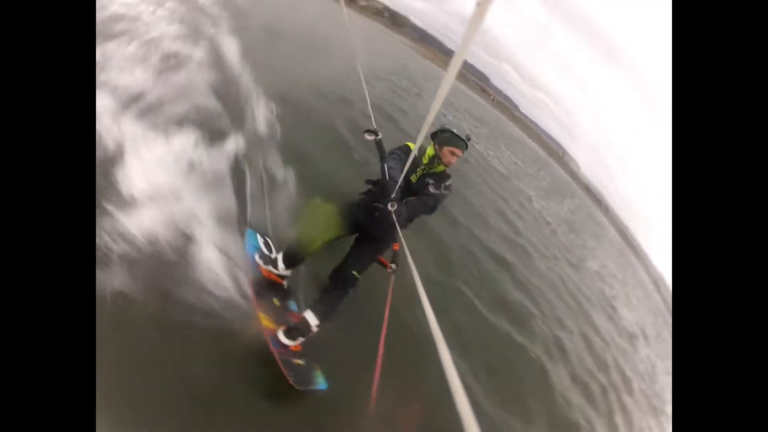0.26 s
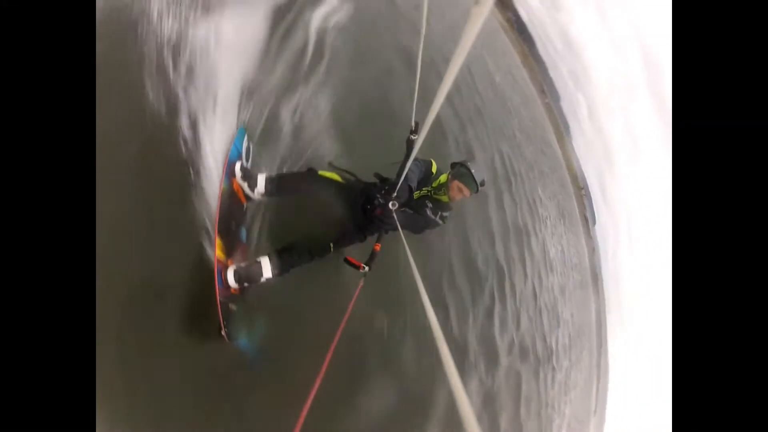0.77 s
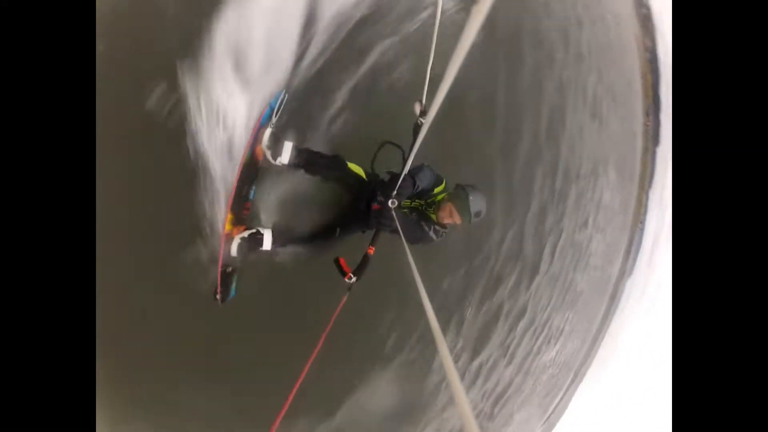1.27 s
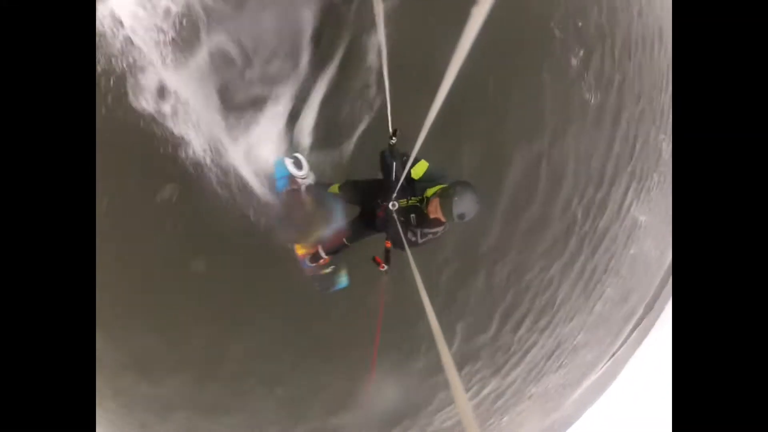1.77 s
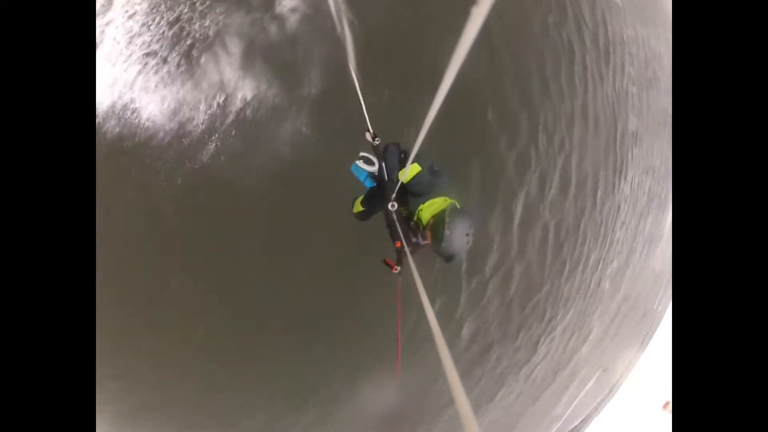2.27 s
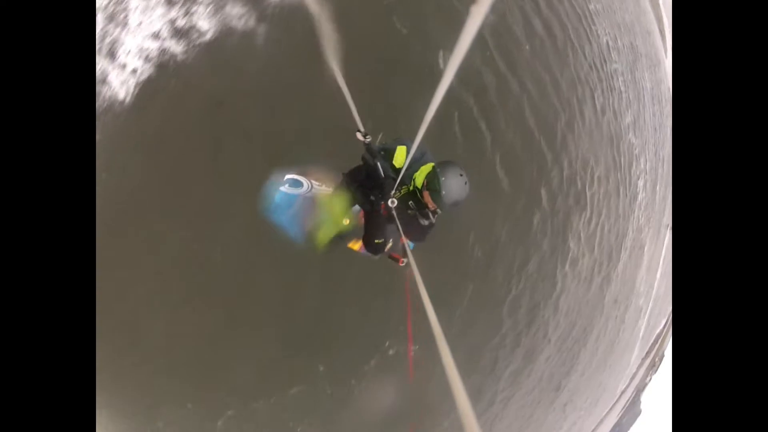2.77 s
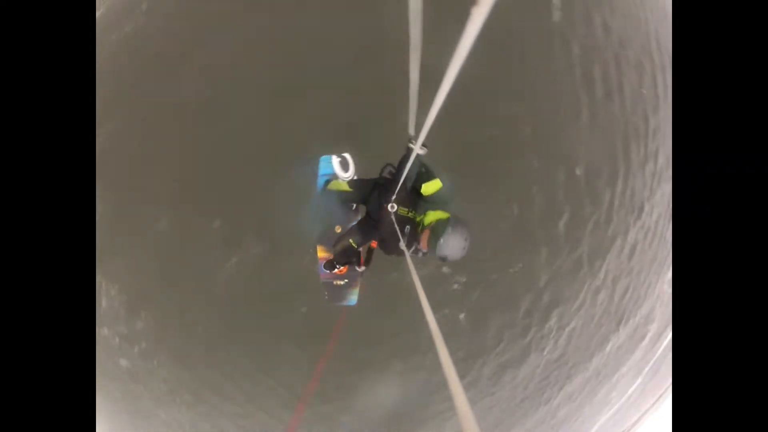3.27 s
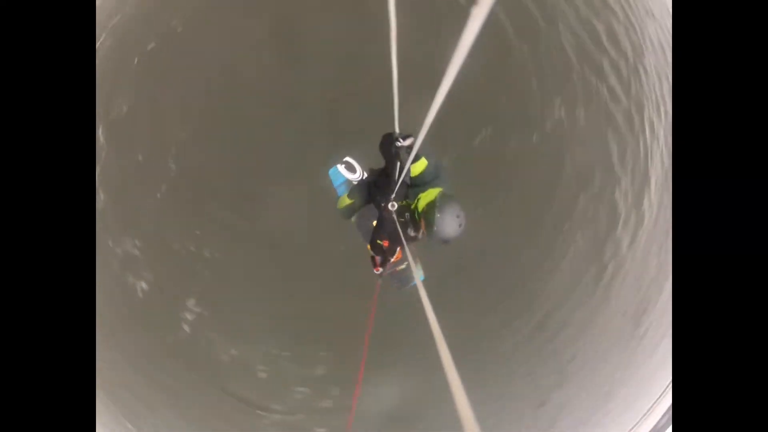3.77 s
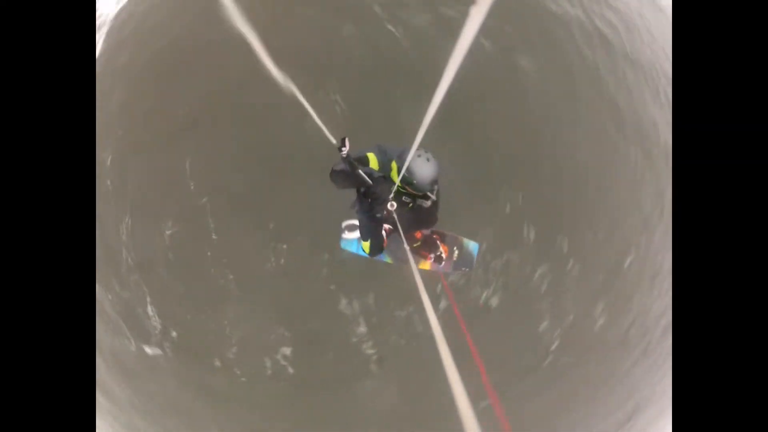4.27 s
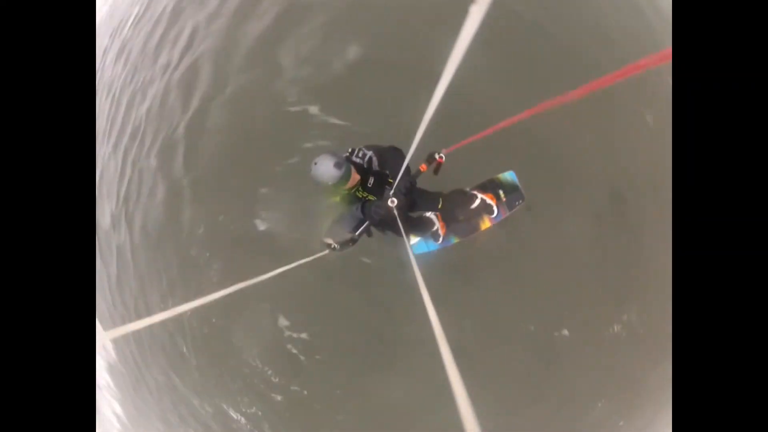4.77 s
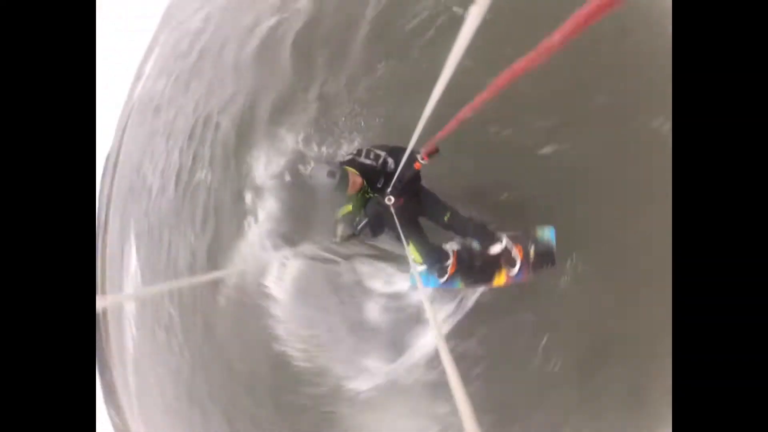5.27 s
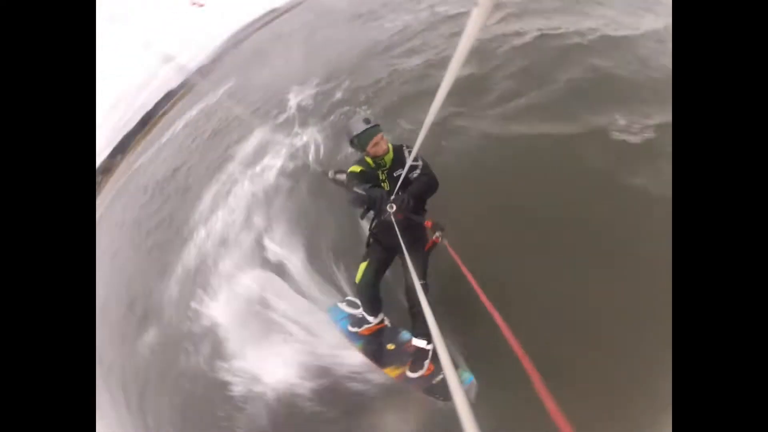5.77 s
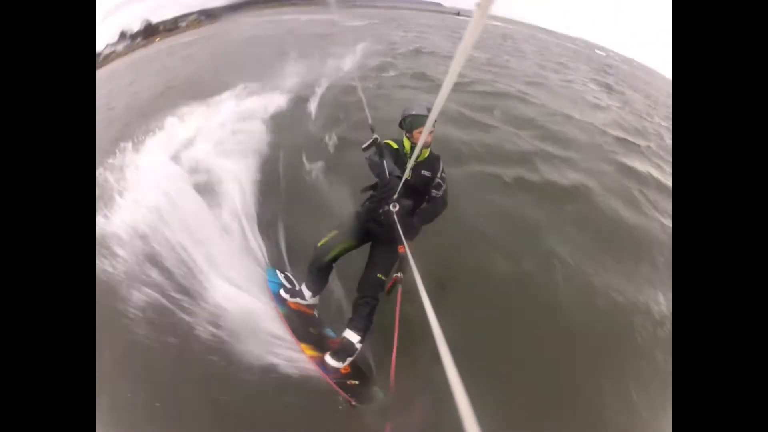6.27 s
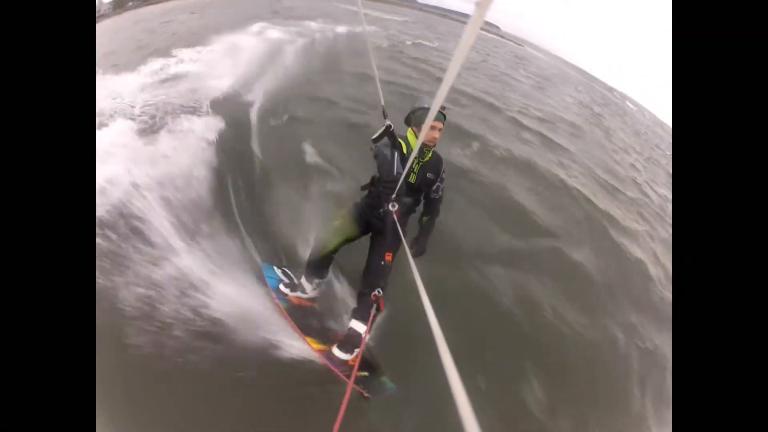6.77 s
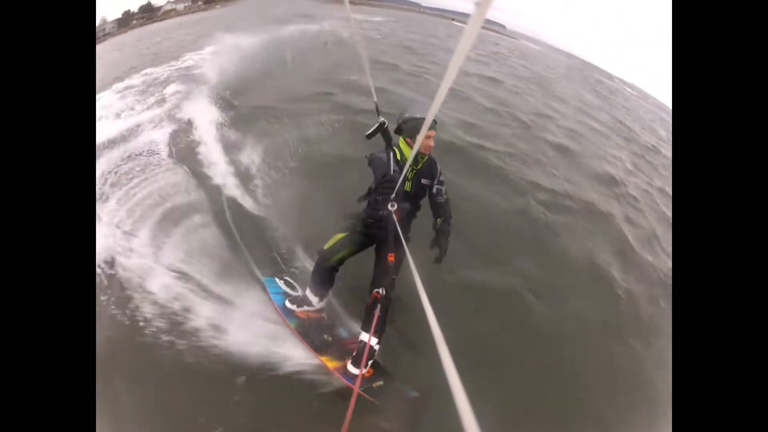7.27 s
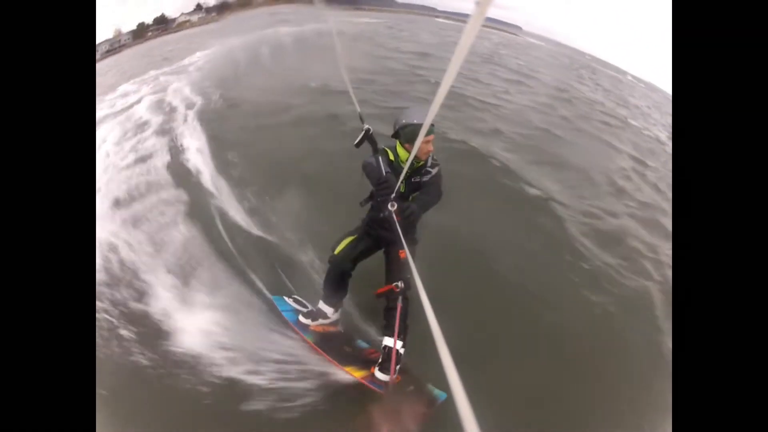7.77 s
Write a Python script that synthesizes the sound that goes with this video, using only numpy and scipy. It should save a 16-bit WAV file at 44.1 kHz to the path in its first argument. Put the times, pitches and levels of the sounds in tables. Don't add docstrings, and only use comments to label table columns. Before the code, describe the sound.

From 0 s, taut kite lines give a loud, breathy, wavering hum around 900 to 1200 hertz, two close rough tones with a weaker upper whistle, over soft low air and thin water hiss. A small knock lands at 0.9 s. Gusts thicken and pitch rises towards 1.8 s, when a heavy low thump hits; everything ducks and recovers within a third of a second. The hum continues in the air, sagging lower near 3.2 s, with a firm knock at 2.7 s. At 4.7 s landing clacks begin, followed by hollow thuds, wet ticks, low shudders and spray until about 5.7 s. More knocks follow to 6.6 s as the hum almost disappears, exposing rumbling gusts and hiss. From 6.75 s the hum surges back, purer, rising in pitch to the end at 8 s, with brief fizzing mist. Close, boxy, nearly mono, with a gritty high edge.

```python
import sys
import numpy as np
from scipy import signal
from scipy.fft import rfft, irfft, next_fast_len
from scipy.io import wavfile
from scipy.ndimage import uniform_filter1d, map_coordinates

SR = 44100
rng = np.random.default_rng(int(sys.argv[2]) if len(sys.argv) > 2 else 0)


def bounce(signal):
    frames = np.transpose(np.atleast_2d(signal))
    limited = np.clip(frames, -1, 1)
    pcm = np.round(limited * 32767).astype(np.int16)
    wavfile.write(sys.argv[1], SR, pcm)


def level_to_linear(level):
    exponent = np.asarray(level, float) / 20
    return 10 ** exponent


N = 353241
CLIP_LEVEL = 0.5
SWING_HZ = 119


def unit(x):
    return x / np.sqrt(np.mean(np.abs(x) ** 2) + 1e-20)


def along(points, hz):
    f, v = np.transpose(points)
    return np.interp(np.log(hz + 1), np.log(f + 1), v)


def curves(rows):
    s, *cols = np.transpose(rows)
    return [np.interp(np.arange(N) / SR, s, c) for c in cols]


def wobble(rate_hz):
    coarse = np.arange(0, N + 16, 16)
    knots = rng.standard_normal(int(N * rate_hz / SR) + 4)
    return np.interp(np.arange(N), coarse, map_coordinates(knots, [coarse * rate_hz / SR]))


def coloured(x, points):
    m = next_fast_len(N + 8192)
    gain = level_to_linear(along(points, np.fft.rfftfreq(m, 1 / SR)))
    return irfft(rfft(x, m) * gain, m)[..., :N]


def rush(points, patchy_db):
    z = signal.stft(rng.standard_normal(N), nperseg=512)[2]
    field = uniform_filter1d(rng.standard_normal(z.shape), size=5, axis=0)
    field = uniform_filter1d(field, size=8, axis=1)
    patchy = signal.istft(z * level_to_linear(patchy_db * unit(field)), nperseg=512)[1][:N]
    closed = [(5, -120)] + list(points) + [(1.3 * points[-1][0], -120)]
    return unit(coloured(patchy, closed))


def spells(rows, steep):
    t = np.arange(0, N + 32, 32) / SR
    gain = np.zeros(len(t))
    for s, length, db, *_ in rows:
        gain += level_to_linear(db) * np.exp(-np.abs(2 * (t - s) / length - 1) ** steep)
    return np.interp(np.arange(N) / SR, t, gain)


def ring(t, hz, t60):
    return level_to_linear(-60 * t / t60) * np.sin(2 * np.pi * hz * t)


def add(track, s, sound):
    track[round(s * SR):][:len(sound)] += sound


def vortices(hz, spread, lean, steep, burst_db):
    size = 2 ** 17
    off = np.fft.fftfreq(size) * 32
    slope = steep * np.where(off > 0, 1, 1.067)
    shape = (1 + (off / np.where(off > 0, lean, 1)) ** 2) ** -slope
    packets = np.fft.ifft(shape * np.fft.fft([1, 1j] @ rng.standard_normal((2, size))))
    place = np.cumsum(32 * np.clip(spread, 0.02, 0.4) * hz / SR) % (size - 1)
    bursts = unit(level_to_linear(burst_db * (0.6 * wobble(40) + wobble(120))))
    swell = np.interp(place, np.arange(size), unit(packets)) * bursts
    return np.sqrt(2) * np.real(swell * np.exp(2j * np.pi * np.cumsum(hz) / SR))


# time_s, thick_line_hz, thin_line_hz, spread_share_of_pitch
SHEDDING = [(0, 938, 1090, 0.081), (.45, 881.5, 1021, 0.082), (1.15, 909, 1110, 0.085),
            (1.75, 1064, 1402, 0.097), (2, 948, 1162, 0.096), (2.3, 945.2, 1173, 0.095),
            (2.85, 846.8, 1016, 0.081), (3.25, 744, 1042, .16), (3.55, 879.4, 1056, 0.09),
            (4.45, 889.6, 1200, .095), (4.9, 1021, 1398, .11), (5.15, 967.4, 1229, 0.12),
            (5.7, 963.5, 1153, .11), (6, 1015, 1192, 0.099), (6.6, 772.6, 1149, 0.095),
            (7, 848.8, 1101, 0.06), (7.5, 978, 1203, 0.065), (8.01, 1043, 1317, 0.063)]
# time_s, thick_db, thin_db, wake_tangle_db, thick_lock_in_db
HUM = [(0, -26, -32.5, -3.5, -3.5), (.9, -24, -31, -1.5, 1), (1.3, -24.5, -28.5, 0, -12),
       (1.75, -26.5, -25, 2, -4.5), (2.15, -27, -28.5, 1.5, -1), (2.93, -23.5, -35.5, 0, -3),
       (3.1, -31, -24.5, -1.5, 2), (3.55, -26, -29, 1.5, -1), (3.9, -26.5, -25.5, 7, -1),
       (4.8, -29, -24.5, 3.5, -5), (5.2, -27.5, -29, 8.5, 3), (5.65, -28, -25.5, 3, -5.5),
       (5.85, -31, -50.5, 2, -5), (6.1, -43.5, -63, 1, -11), (6.56, -51.5, -50.5, 2, 7),
       (6.76, -23.5, -36.5, 5, 3), (7.15, -23.5, -41.5, -1, 0.5), (8.01, -24, -35.5, -3, 3.5)]


def lines():
    hz, thin_hz, spread = curves(SHEDDING)
    db, thin_db, tangle_db, lock_db = curves(HUM)
    flutter_db, flutter_hz = 1.5, 14
    db = db + flutter_db * wobble(flutter_hz)
    thin_db = thin_db + flutter_db * wobble(flutter_hz)
    hum_db = 10 * np.log10(level_to_linear(2 * db) + level_to_linear(2 * thin_db))
    full_hum_db, full_wake_db, wake_db_per_hum_db = -23.5, -41.5, 1.5
    wake_db = full_wake_db + tangle_db + wake_db_per_hum_db * (hum_db - full_hum_db)

    thick = vortices(hz, spread, lean=1.58, steep=1.28, burst_db=1.0)
    thin = vortices(thin_hz, 1.05 * spread, lean=1.18, steep=0.99, burst_db=0.4)
    octave = vortices(2.04 * hz, 0.9 * spread, lean=1.05, steep=1.5, burst_db=1.5)
    wake = vortices(1.7 * hz, 2.4 * spread, lean=1.7, steep=1.03, burst_db=3.0)
    thin_octave = vortices(2 * thin_hz, 0.92 * spread, lean=1.0, steep=0.88, burst_db=-1.0)

    thick_line = level_to_linear(db) * (thick + level_to_linear(-19 + lock_db) * octave)
    thin_line = level_to_linear(thin_db) * (thin + level_to_linear(-22.5 + 0.8 * tangle_db) * thin_octave)
    return thick_line + level_to_linear(wake_db) * wake + thin_line


# time_s, gust_over_calm_db, mount_share_db
GUST = [(0, -1.5, -15), (.74, 6, -15), (1, 12.5, -32), (1.2, 11.5, -22), (1.5, 20, -8.5), (1.69, 22, -16),
        (1.85, 11.5, -25), (2.2, 9, -30), (2.6, 6, -16), (2.85, 9, -8.5), (3.35, 10.5, -9.5), (3.7, 10, -6),
        (4.55, 17, -14.5), (5.95, 15.5, -10.5), (6.25, 9, -4), (6.57, 16, -10), (7.05, 12.5, -8),
        (7.3, 3, -22)]
# freq_hz, density_db_per_hz
BUFFET = [(12, -36), (20, -19.5), (60, -9), (124, -3.5), (139, 0.5), (205, 0.5), (290, -7), (344, -6.5),
          (388, -14.5), (426, -19.5), (480, -13), (620, -43), (1060, -120)]
# freq_hz, density_db_per_hz
SWING = [(95, -14), (122, 8), (150, -29.5)]
# freq_hz, density_db_per_hz
DRONE = [(250, -17.5), (400, -14), (460, -5), (500, 6), (545, -3), (620, 3), (800, 7), (1500, -5),
         (2300, -26), (2600, -32.5)]


def buffeting():
    gust_db, mount_db = curves(GUST)
    calm_db = -48
    buffet_db = calm_db + gust_db + 1.02 * wobble(6)
    lumps = wobble(18)
    air = rush(BUFFET, patchy_db=-0.5) + 0.3 * rush(SWING, patchy_db=3.0)
    buffet = level_to_linear(buffet_db) * unit(level_to_linear(2.7 * lumps) * air)
    drone = unit(level_to_linear(2.1 * lumps) * rush(DRONE, patchy_db=3.0))
    return buffet + level_to_linear(buffet_db + mount_db + 6.0) * drone


# start_s, peak_db, pitch_hz, rise_s, case_swing_db
KNOCKS = [(0.863, -17.5, 590, 0.00052, -7), (2.038, -31, 412, 0.0027, -7), (2.662, -10, 314, 0.0013, -16.5),
          (2.841, -33.5, 301.6, 0.0019, -12.5), (4.795, -16, 414.5, 0.0013, -15),
          (5.117, -16, 350, 0.00091, -32), (5.197, -21, 307, .003, -4), (5.745, -6, 392, 0.0011, -6),
          (5.949, -31, 281.4, 0.0014, -17), (6.056, -12, 425, 0.0012, -11.5),
          (6.189, -19, 296, 0.0026, -22), (6.437, -13.5, 453, 0.0013, -7.5), (6.476, -20, 305, 0.0016, -21),
          (6.629, -21, 288, .003, -30)]


def knocks():
    out, t = np.zeros(N + SR), np.arange(SR // 4) / SR
    chirp_s = 0.0052 * np.log1p(t / 0.0053)
    swing = ring(t, SWING_HZ, 0.14) * (1 - np.exp(-t / 0.0029))
    for s, db, hz, rise, swing_db in KNOCKS:
        jolt = -t / rise * np.exp(1 - t / rise) * np.sin(2 * np.pi * hz * chirp_s)
        add(out, s, level_to_linear(db) * (jolt + level_to_linear(swing_db) * swing))
    return out[:N]


# start_s, level_db, pitch_hz, gain_drop_after_s, rebound_s, rebound_db
SLAM = (1.8191, 2.5, 222, .0092, 1.8354, -12)


def slam():
    out, t = np.zeros(N + SR), np.arange(SR // 4) / SR
    s, db, hz, hold, rebound_s, rebound_db = SLAM
    lurch = np.sin(2 * np.pi * hz * t) - t / 0.01 * np.sin(np.pi * hz * t)
    add(out, s, level_to_linear(db) * lurch * (t < hold))
    push = np.clip((rebound_s - s - hold - t) / 0.002 + 0.5, 0, 1)
    add(out, s + hold, level_to_linear(rebound_db - 9) * push)
    add(out, rebound_s, -level_to_linear(rebound_db) * ring(t, SWING_HZ, 0.062))
    return out[:N]


# start_s, peak_db, pitch_hz, t60_s, pitch_fall_share
TICKS = [(1.628, -39.5, 3520, 0.011, 0.066), (2.040, -36, 3050, 0.0066, 0.18),
         (1.68, -38.5, 4990, 0.016, 0.043), (2.155, -40, 4530, 0.0049, 0.074),
         (2.2, -29.5, 4400, 0.0062, 0.54), (1.8274, -22, 2410, 0.0088, .3), (3.73, -47, 4380, 0.0055, 0.34),
         (4.32, -38, 3500, 0.0096, 0.075), (4.483, -39, 3420, 0.0063, 0.18), (4.582, -35, 4860, 0.01, 0.13),
         (4.684, -22.5, 5527, 0.058, .63), (4.687, -8, 2494, 0.0089, 0.55), (4.792, -9, 2260, 0.017, .05),
         (4.794, -18, 3700, 0.015, .35), (4.849, -15.5, 1836, 0.022, 0), (5.195, -17.5, 2240, 0.019, 0.015),
         (5.199, -9.5, 1504, .015, 0), (5.274, -33.5, 4120, 0.0038, 0.16), (5.403, -25.5, 3430, 0.013, 0),
         (5.44, -31, 3110, .008, 0.12), (5.488, -19, 3110, 0.011, 0.14), (5.651, -32, 3130, 0.014, 0.0049),
         (6.431, -20, 1433, 0.031, 0), (7.366, -39.5, 3560, 0.0088, 0.081)]


def ticks():
    out, t = np.zeros(N + SR), np.arange(SR // 4) / SR
    for s, db, hz, t60, fall in TICKS:
        pitch_hz = hz * (1 - fall * np.minimum(t / 0.005, 1))
        tone = np.sin(2 * np.pi * np.cumsum(pitch_hz) / SR)
        tone *= 1 + 0.87 * uniform_filter1d(rng.standard_normal(len(t)), size=14)
        splash = uniform_filter1d(rng.standard_normal(len(t)), size=5)
        envelope = level_to_linear(db - 60 * t / t60) * (1 - np.exp(-t / (0.14 * t60)))
        add(out, s, envelope * (1.83 * tone + 0.38 * splash))
    return out[:N]


# start_s, length_s, level_db, pitch_hz
SWAYS = [
    (4.858, 0.017, -16, 130.5),
    (5.356, 0.063, -12.5, 130.4),
    (5.536, 0.04, -24.5, 188.9),
    (5.567, .085, -16.5, 112),
    (6.828, 0.095, -27, 105),
    (7.461, .12, -37, 165),
]


def shudders():
    middles_s = [s + length / 2 for s, length, *_ in SWAYS]
    hz = np.interp(np.arange(N) / SR, middles_s, [row[-1] for row in SWAYS])
    push = np.sin(2 * np.pi * np.cumsum(hz * (1 + 0.18 * wobble(90))) / SR)
    shake = level_to_linear(0.29 * wobble(96)) * push + 0.43 * rush(BUFFET, patchy_db=-3.2)
    return spells(SWAYS, 4.0) * shake


# freq_hz, density_db_per_hz
HISS = [(1530, -33.5), (2600, -15.5), (2720, -5), (3230, -20.5), (3650, -7.5), (4230, -16), (4880, -21.5),
        (5290, -18), (6000, -35.5), (7800, -72.5), (13200, -120)]
# freq_hz, density_db_per_hz
SPRAY = [(1180, -29), (2000, -5.5), (2290, -4), (2560, -12), (2840, -6), (3080, -18), (3720, -5.5),
         (4330, -17.5), (4720, -15), (5020, -11), (5680, -20), (6000, -36), (7800, -66), (13200, -120)]
# time_s, level_db
WATER = [(0, -63.5), (.55, -58), (1, -62), (1.35, -62.5), (1.67, -59.5), (2.24, -60.5), (2.6, -64),
         (2.95, -69), (3.2, -64), (3.57, -67), (3.9, -62), (4.66, -63), (4.72, -53.5), (5.15, -62),
         (5.75, -55), (6.5, -56.5), (7.1, -59.5), (8.01, -64)]
# start_s, length_s, level_db
SPLASHES = [(4.68, .016, -43.5), (4.788, 0.015, -45), (4.76, .06, -55), (4.82, 0.14, -57.5),
            (4.96, 0.083, -54), (5.04, .05, -46), (5.18, .04, -49.5), (5.225, .025, -52), (5.315, .14, -48),
            (5.475, .035, -44.5), (5.545, 0.086, -50), (6.14, 0.018, -70), (6.53, 0.21, -50.5),
            (6.8, 0.23, -51)]


def spray():
    landing_s = 4.685
    before, after = rush(HISS, patchy_db=-1.0), rush(SPRAY, patchy_db=1.6)
    colour = np.where(np.arange(N) < landing_s * SR, before, after)
    flurries = unit(level_to_linear(1.2 * wobble(30) + 1.57 * wobble(250)) * colour)
    return (level_to_linear(curves(WATER)[0]) + spells(SPLASHES, 3.0)) * level_to_linear(4.0) * flurries


# freq_hz, density_db_per_hz
FIZZ = [(4100, -24), (4600, 4), (5100, 1), (5600, -26)]
# start_s, length_s, level_db
FIZZES = [
    (6.85, 0.2, -49),
    (5.04, 0.035, -59),
    (6.57, .12, -55),
]


def mist():
    return spells(FIZZES, 2.8) * unit(level_to_linear(2.5 * wobble(300)) * rush(FIZZ, patchy_db=-2.0))


def ducking():
    duck_db, recover_s, give = -19, 0.27, 2.04
    since_s = np.arange(N) / SR - SLAM[0] - SLAM[3]
    duck = level_to_linear(duck_db * (since_s > 0) * np.clip(1 - since_s / recover_s, 0, 1))
    return duck / (1 + give * spells(SWAYS, 12.0))


# freq_hz, gain_db
LINE_TONE = [(20, 3.5), (1500, 0.5), (2000, 1), (2300, 0.5), (2550, -5.5), (3300, -0.5), (4200, -11.5),
             (6000, -22.5)]
# freq_hz, gain_db
LEFT_RIGHT = [(20, -8), (60, -24), (150, -37), (300, -34), (700, -38), (1400, -42), (2500, -34), (5000, -21)]


def scene():
    steady = coloured(lines(), LINE_TONE) + buffeting() + spray() + mist()
    sound = steady * ducking() + knocks() + slam() + ticks() + shudders()
    limited = np.clip(sound, -CLIP_LEVEL / 2, CLIP_LEVEL / 2)
    apart = coloured(limited, LEFT_RIGHT) * level_to_linear(1.2) * wobble(58)
    return np.array([sound + apart, sound - apart])


# freq_hz, gain_db
EDGE = [(20, 0), (5500, 0), (5750, 3.5), (6000, -1.5), (6300, -35)]
# freq_hz, gain_db
TREBLE = [(20, 0), (15000, 0), (15300, -5), (15600, -11), (16000, -20)]


def slow_sampler(dry):
    step = 147 / 40
    times = np.arange(N * 40 // 147) * step
    slow = [map_coordinates(side, [times]) for side in coloured(dry, EDGE)]
    held = np.repeat(np.clip(slow, -CLIP_LEVEL, CLIP_LEVEL), 4, axis=1)
    return coloured(signal.resample_poly(held, 147, 160, axis=1), TREBLE)


def low_pass(x):
    return signal.sosfilt(signal.butter(12, 15690, fs=SR, output="sos"), x)


def record(dry):
    mix = slow_sampler(dry)
    return low_pass(mix)


dry = scene()
out = record(dry)
bounce(out)
```